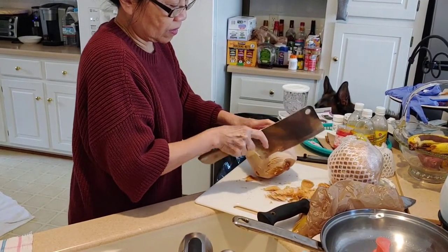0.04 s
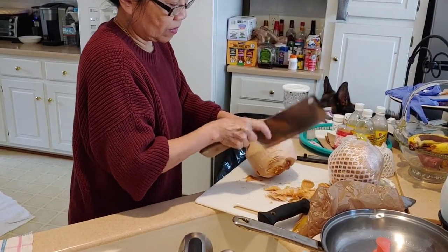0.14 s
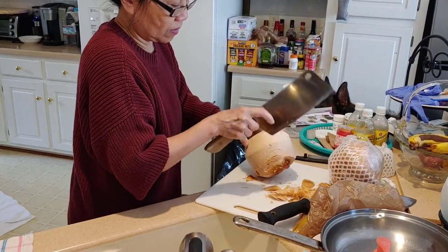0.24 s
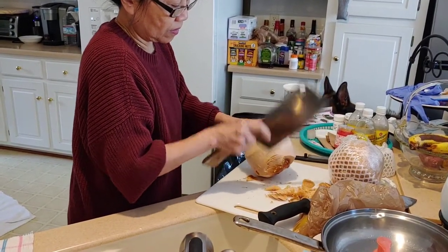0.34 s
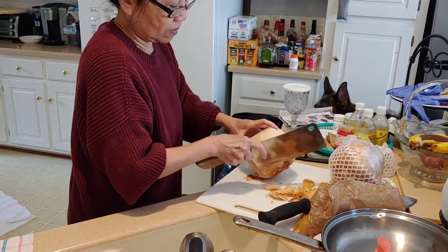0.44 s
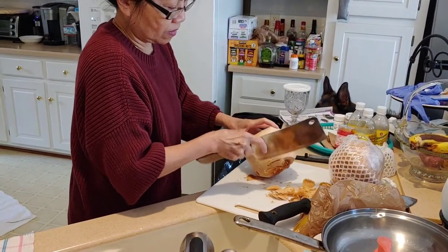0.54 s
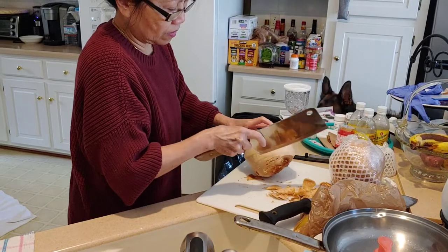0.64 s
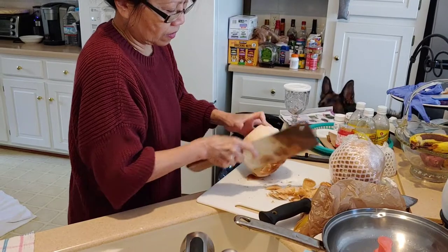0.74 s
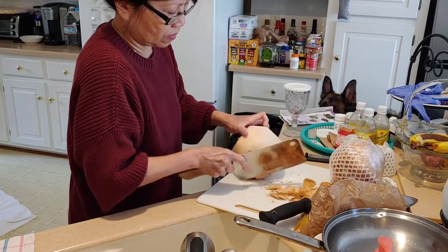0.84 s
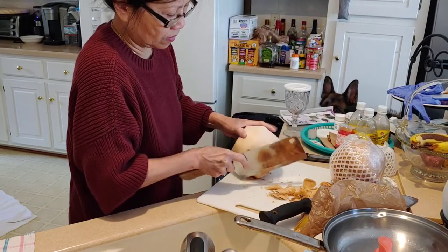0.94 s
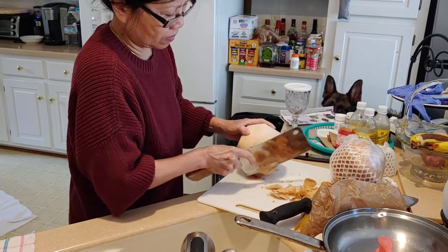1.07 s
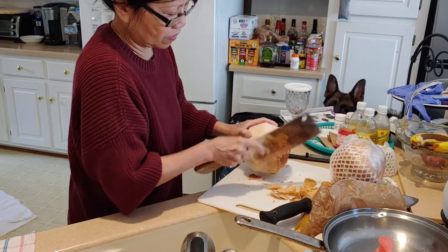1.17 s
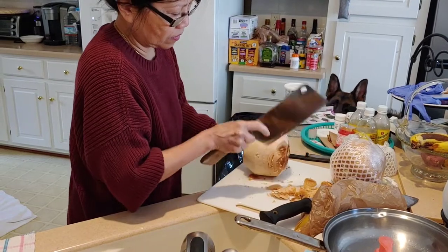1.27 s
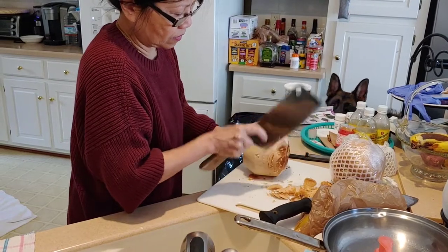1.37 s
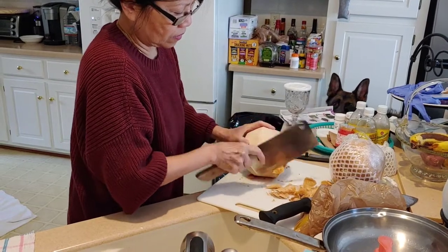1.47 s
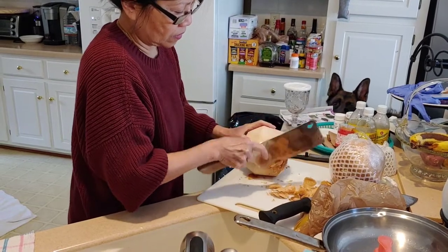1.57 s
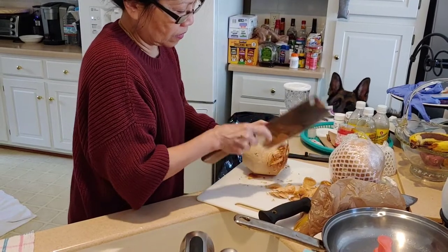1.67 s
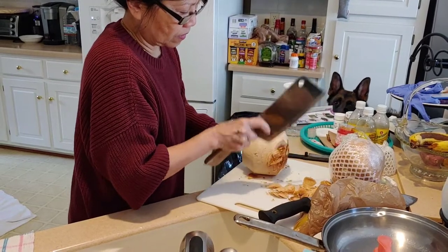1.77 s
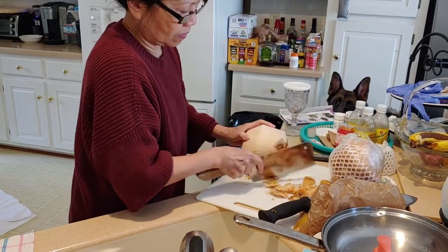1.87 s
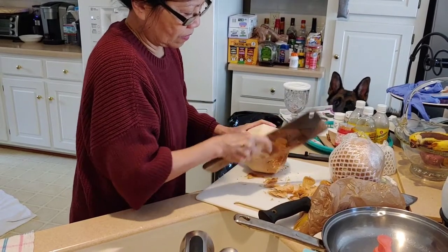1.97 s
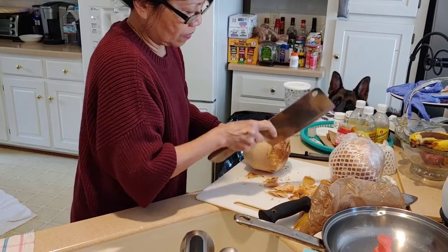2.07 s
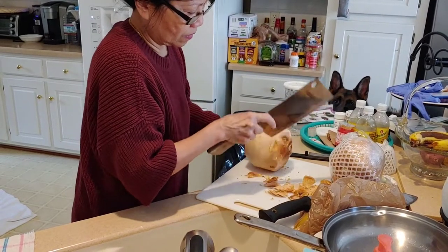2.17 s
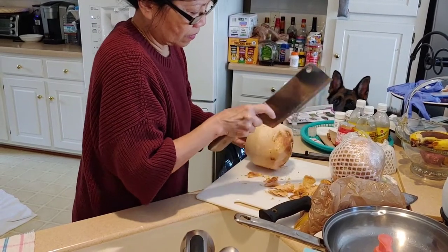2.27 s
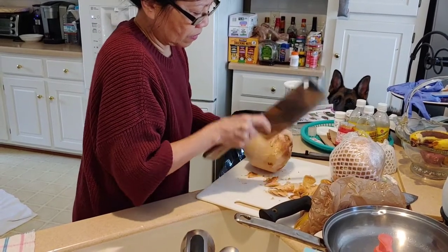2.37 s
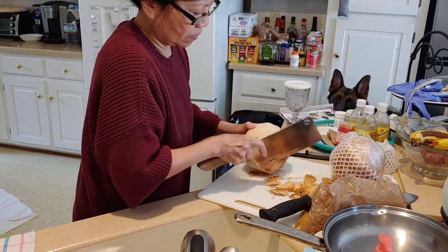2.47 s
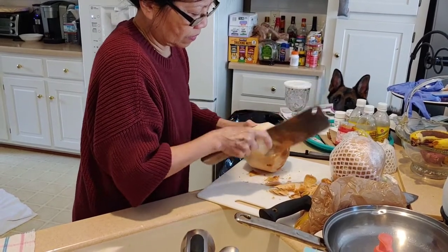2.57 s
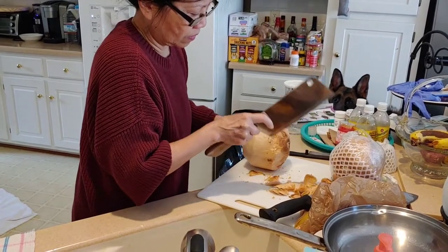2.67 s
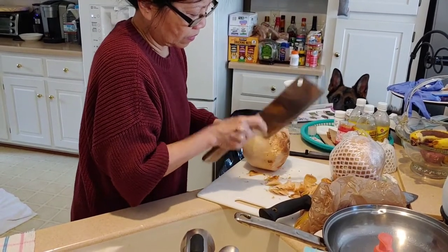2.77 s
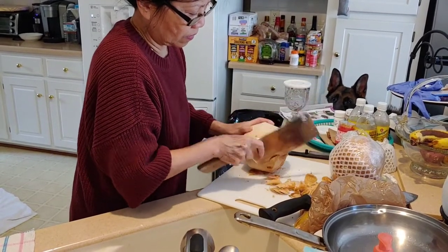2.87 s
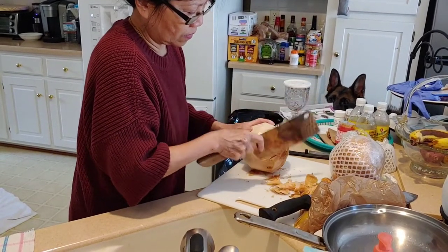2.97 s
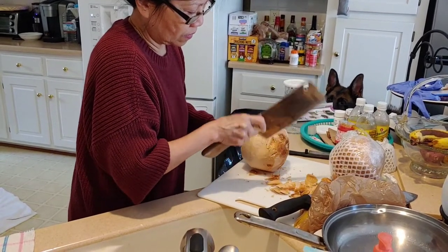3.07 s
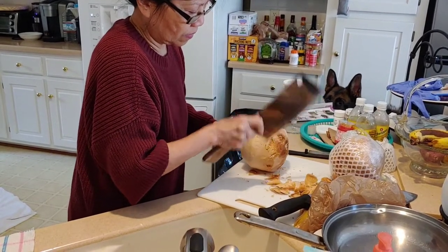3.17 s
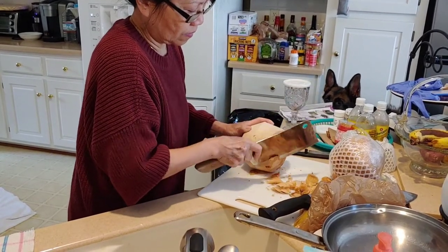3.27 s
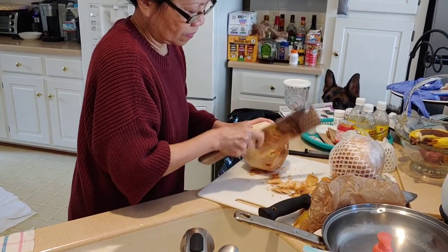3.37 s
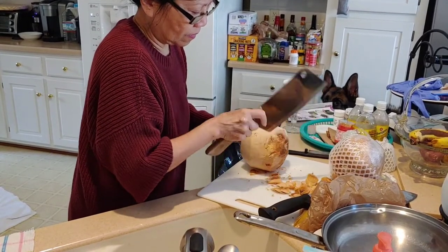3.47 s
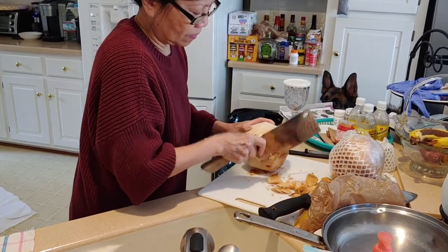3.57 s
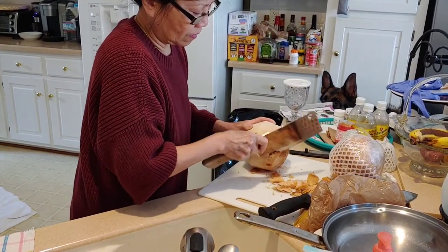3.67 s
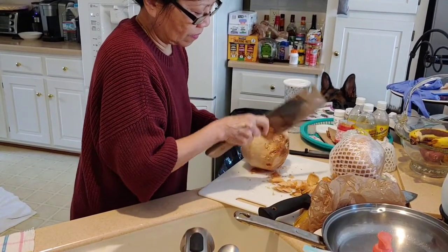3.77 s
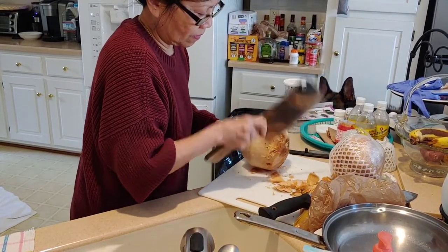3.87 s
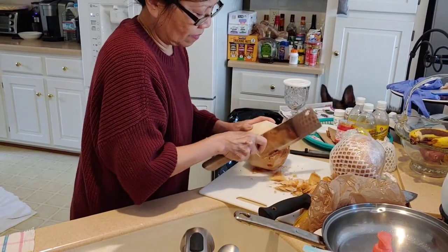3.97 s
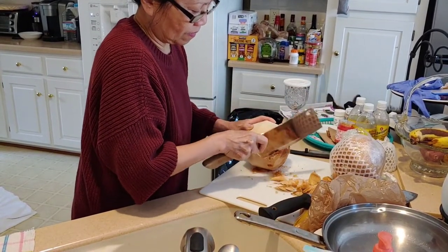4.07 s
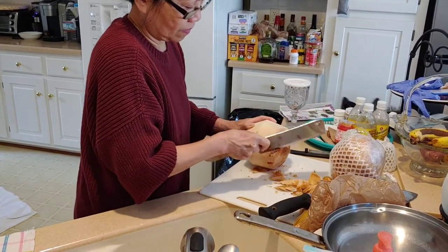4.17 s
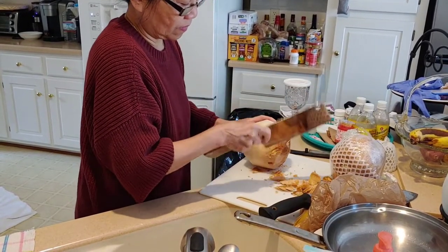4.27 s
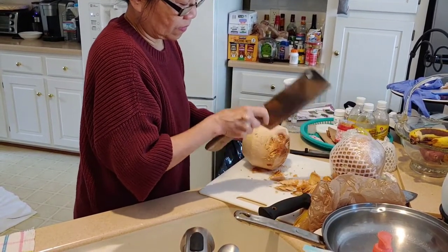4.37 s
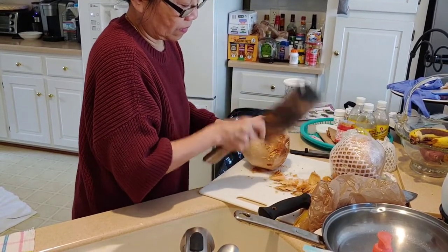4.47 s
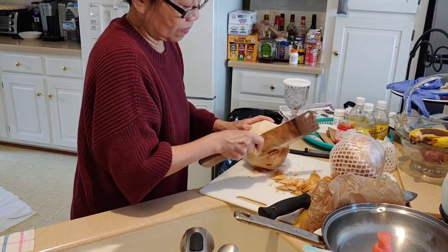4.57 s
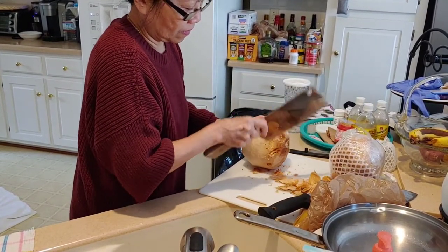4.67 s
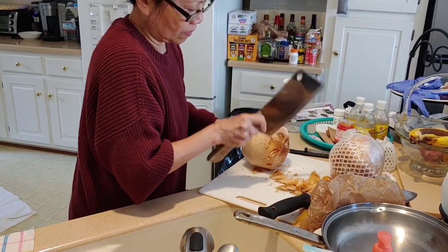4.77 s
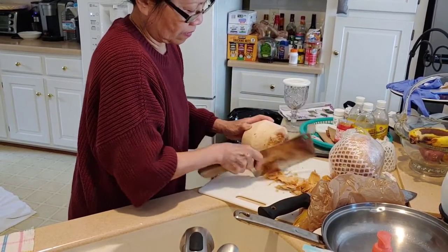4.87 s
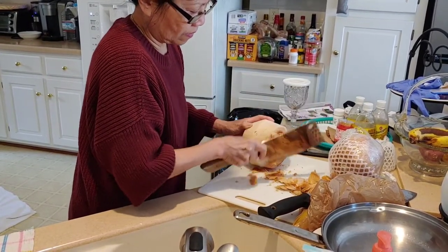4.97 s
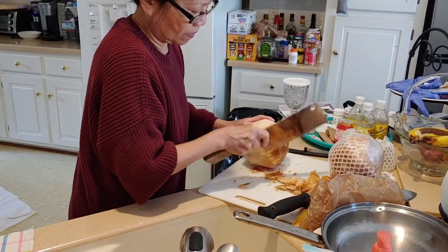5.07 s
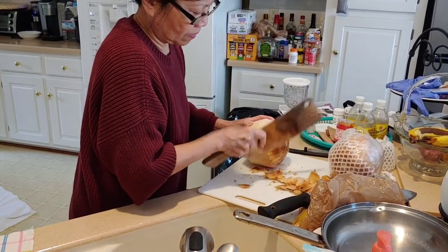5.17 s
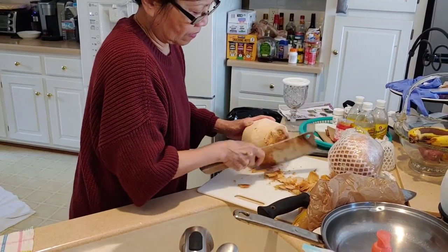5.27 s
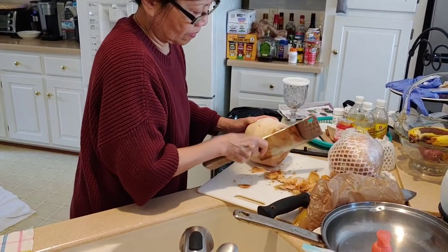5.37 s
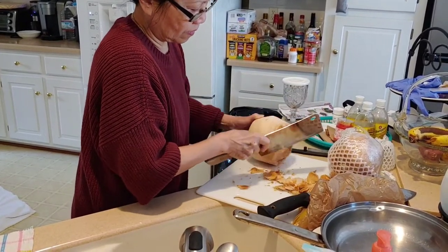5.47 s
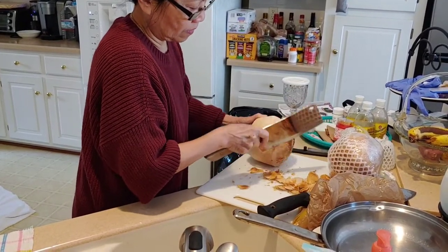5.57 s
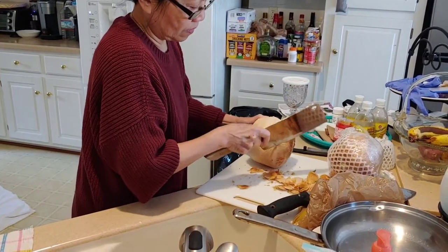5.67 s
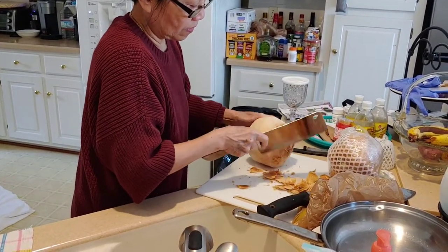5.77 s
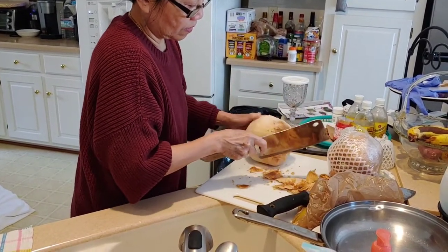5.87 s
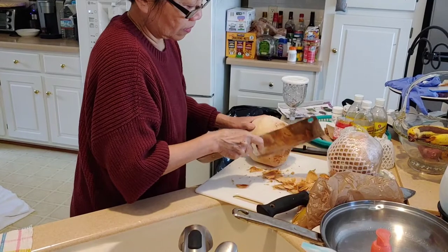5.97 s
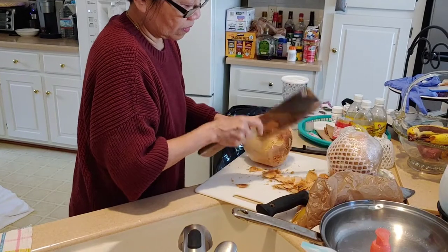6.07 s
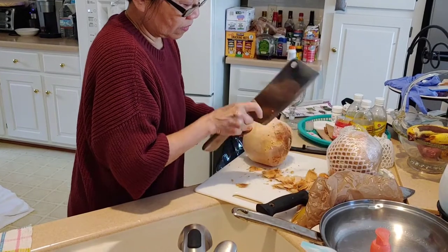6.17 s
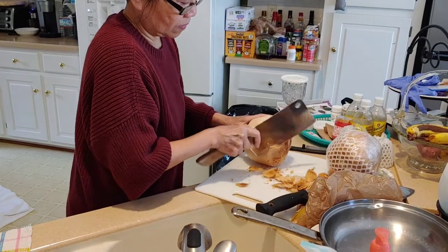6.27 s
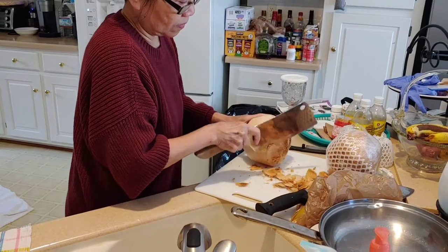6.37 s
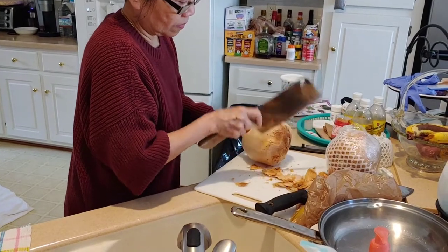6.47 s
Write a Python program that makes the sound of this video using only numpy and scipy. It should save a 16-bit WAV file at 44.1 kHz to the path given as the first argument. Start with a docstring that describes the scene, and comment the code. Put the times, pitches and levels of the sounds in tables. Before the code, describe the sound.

Close to the microphone, a heavy cleaver pares a fibrous coconut on a plastic board. About fourteen uneven chops crunch and tear the husk, each with a low thump that shakes the counter. Three sharp smacks ring the board as the blade comes through, and the nut groans briefly after one hard blow. Faint scuffs fill gaps; a hard-walled kitchen rings shortly over soft fridge hum.

```python
"""In a live, hard-walled kitchen, a heavy cleaver pares a coconut on a plastic board, near the microphone.
Each chop tears fibres in showers of grains and thumps the nut, which shakes the counter's modes.
Three firm blows and a faint one smack the board, ringing its modes and the blade's.
The nut groans as it rocks after one hard blow, grainy scuffs brush the husk,
and a fridge behind adds wavering hum over room hush."""
import sys
import numpy as np
from scipy import signal
from scipy.fft import rfft, irfft, next_fast_len
from scipy.io import wavfile

SR = 44100
rng = np.random.default_rng(int(sys.argv[2]) if len(sys.argv) > 2 else 0)


def store_pcm(level_fs):
    """Save levels as 16-bit WAV."""
    pcm = np.round(np.clip(level_fs, -1, 1) * 32767).astype(np.int16)
    wavfile.write(sys.argv[1], SR, np.atleast_2d(pcm).T)


N = 287948  # samples
AGE = np.arange(SR // 3) / SR  # time since a contact, s
USUAL_FORCE_DB = -19.5  # force of a chop, taken as the level of its crunch


def amp(db):
    """Decibels to gain."""
    return 10 ** (np.asarray(db) / 20)


def read(points, hz):
    """Read a table of (Hz, value) on a log-frequency axis."""
    f, value = np.transpose(points)
    return np.interp(np.log(np.maximum(hz, 1)), np.log(f), value)


def colour(x, points):
    """Causal, minimum-phase filter with the given spectrum in dB, made by folding its cepstrum."""
    size = 4096
    log_gain = np.log(amp(read(points, np.fft.rfftfreq(size, 1 / SR))))
    cepstrum = irfft(log_gain)
    cepstrum[1:size // 2] *= 2
    cepstrum[size // 2 + 1:] = 0
    response = irfft(np.exp(rfft(cepstrum)))
    return signal.fftconvolve(x, response)[:len(x)]


def burst(x, db):
    """Give a short sound the energy of ten milliseconds at this RMS level."""
    return x * amp(db) * np.sqrt(SR / 100 / np.sum(x ** 2))


def fade(t, t60):
    """Exponential decay by 60 dB in t60 seconds."""
    return np.exp(-np.log(1000) * t / t60)


def add(track, s, x):
    """Mix a sound in at a time in seconds."""
    i = max(int(s * SR), 0)
    track[..., i:i + x.shape[-1]] += x[..., :max(N - i, 0)]


def even(x, flatness=0.76):
    """Level the chance spectral peaks of a short crackle, so that it has little pitch of its own."""
    spectrum = rfft(x)
    flattened = spectrum / (np.abs(spectrum) + 1e-9) ** min(flatness, 1)
    return irfft(flattened, len(x)) * (AGE < .1)


def grains(envelope, per_s, spread_db):
    """Random clicks of very unequal size under an envelope, like fibres parting one by one."""
    n = len(envelope)
    size = amp(abs(spread_db) * np.minimum(rng.exponential(size=n), 4))
    happens = rng.random(n) < per_s / SR
    return even(envelope * happens * size * rng.choice([-1, 1], n))


def ring(push, modes, ratio=1, scatter=0.015):
    """Modes rung by a push; the grip and the point of contact detune them a little."""
    tones = np.zeros(len(AGE))
    for hz, db, t60 in modes:
        detuned_hz = hz * ratio * (1 + scatter * rng.standard_normal())
        tone = np.sin(2 * np.pi * detuned_hz * AGE)
        tones += amp(db) * fade(AGE, t60) * tone * rng.choice([-1, 1])
    return signal.fftconvolve(push, tones)[:len(AGE)]


# The blade into the husk. Each row: start in seconds, length of the cut in seconds, force in dB,
# fibre fizz in dB, crack in dB, pitch of the nut's thud in Hz.
CHOPS = [(0.000, 0.014, -19, -29, -34, 164), (0.436, .024, -22.5, -31.5, -50, 198),
         (1.286, 0.0085, -13.5, -24.5, -17, 129), (1.474, 0.023, -29, -32.5, -39, 191),
         (1.883, .0105, -26, -34, -37, 260), (2.484, 0.028, -29.5, -39, -55, 270),
         (2.886, 0.027, -22, -34, -43, 257), (3.275, 0.028, -20.5, -29, -29.5, 168),
         (3.622, 0.028, -20.5, -31.5, -33, 190), (3.964, .012, -10.5, -27.5, -24, 162),
         (4.566, 0.0071, -10, -24, -19.5, 217), (4.887, 0.025, -21, -30.5, -24, 236),
         (5.272, .036, -33.5, -32, -49, 197), (6.32, .021, -23.5, -26, -34, 225)]
# The dull crunch of crushed husk. Each row: frequency in Hz, relative level in dB.
CRUNCH_SPECTRUM = [(100, -17.5), (220, 2.5), (350, 4.5), (500, -2.5), (700, 0.5), (1000, 1), (1350, -3.5),
                   (2100, -5), (2800, -19.5), (5000, -25.5), (12000, -45.5)]
# The steel of the cleaver. Each row: mode in Hz before detuning, relative level in dB, t60 in seconds.
BLADE_MODES = [(1365, -3.5, 0.091), (1518, 4.5, 0.096), (1946, 5.5, .07), (3300, -11, .05),
               (3575, 1, 0.049), (5520, -9, 0.065), (6360, 8, 0.046)]
THUD_DB, THUD_GROWTH = -21.5, 1.34  # thud at the usual force; dB more for each dB of force
# counter sway at the usual force, dB; dB more for each dB of force; length of cut in s that gives this
SHOVE_DB, SHOVE_GROWTH, SHOVE_S = -19.5, 0.73, 0.019


def chops(blade_db=-20, crunch_lag=0.85, judder_db_per_s=330, firm_judder_db=-6,
          air_db_per_s=450, firm_air_db=-8, thud_lead=0.0012):
    """Fibres tear one after another as the edge sinks in; the deeper, duller crunch follows the first fizz."""
    out = np.zeros(N)
    for s, length, force_db, fizz_db, _, thud_hz in CHOPS:
        depth = AGE / length
        extra_force_db = force_db - USUAL_FORCE_DB
        fibres = grains(np.exp(-depth ** 2), per_s=4100, spread_db=4)
        crush = grains(depth ** crunch_lag * np.exp(-1.3 * depth ** 2), per_s=5500, spread_db=2.5)
        # a long, glancing cut hisses more and drags the nut about more than a firm one
        cut = burst(fizz(fibres, firm_air_db + air_db_per_s * length), fizz_db)
        cut = cut + burst(colour(crush, CRUNCH_SPECTRUM), force_db)
        cut = cut + burst(ring(fibres, BLADE_MODES), fizz_db + blade_db)
        judder_db = firm_judder_db + judder_db_per_s * length
        body = thud(thud_hz, THUD_DB + THUD_GROWTH * extra_force_db, counter_db=-8.5, judder_db=judder_db)
        # a longer push moves the counter more
        sway = rumble(SHOVE_DB + SHOVE_GROWTH * extra_force_db) * length / SHOVE_S
        add(out, s, cut)
        add(out, s - thud_lead, body + sway)  # the nut is pushed just before the husk gives way
    return out


# The bright tearing of fibres. Each row: frequency in Hz, relative level in dB.
FIZZ_SPECTRUM = [(800, -3.5), (2200, -11), (3600, 1.5), (5200, 1.5), (6600, 5), (7800, -7), (11500, -10.5),
                 (13000, -24)]


def fizz(x, air_db):
    """The bright part of a cut, with more or less of the very top."""
    bright = colour(x, FIZZ_SPECTRUM)
    return colour(bright, [(6000, 0.0079), (11000, air_db)])


# The counter under the board. Each row: mode in Hz before detuning, relative level in dB, t60 in seconds.
COUNTER_MODES = [(61, -11.5, 0.39), (83, -8.5, 0.14), (115, -4, 0.14), (174.3, 10, 0.28), (270, -3, 0.057),
                 (332.2, 4, 0.27), (400, -5, 0.1)]
# The nut juddering to rest. Each row: frequency in Hz, relative level in dB.
JUDDER_SPECTRUM = [(20, -7.5), (35, -3.5), (70, 5), (115, -1.5), (160, -2), (255, 0.5), (340, -7),
                   (450, -12.5), (900, -25), (3000, -81.5)]


def thud(hz, db, counter_db, judder_db, cycles=1.0, judder_s=0.024):
    """The nut bounces on the board for a cycle or two, shakes the counter and judders to rest."""
    turns = hz * AGE
    bounce = np.sin(2 * np.pi * turns) * np.sqrt(turns) * np.exp(-turns / cycles)
    shake = ring(np.exp(-AGE / 0.00029), COUNTER_MODES, scatter=0.039)
    swell = np.sqrt(AGE) * np.exp(-AGE / judder_s)
    judder = colour(rng.standard_normal(len(AGE)) * swell, JUDDER_SPECTRUM)
    return burst(bounce, db) + burst(shake, db + counter_db) + burst(judder, db + judder_db)


# The low sway of the counter. Each row: frequency in Hz, relative level in dB.
RUMBLE_SPECTRUM = [(18, -8), (33, -9), (65, -4), (120, -8), (190, -11.5), (400, -37), (1500, -76.5)]


def rumble(db, swell_s=0.026):
    """The shove of the blade sets the whole counter swaying, late and low."""
    shove = rng.standard_normal(len(AGE)) * AGE * np.exp(-AGE / swell_s)
    return burst(colour(shove, RUMBLE_SPECTRUM), db)


CRACK_DEPTH = 0.35  # share of the cut at which a bundle of fibres gives way
# pitch at the usual force; this much more force breaks a bundle an octave lower
CRACK_HZ, CRACK_DB_PER_OCTAVE = 5270, 17.5
CATCH_DB, CATCH_DB_PER_S = -19, -650  # blade ring on a dead stop; a longer cut weakens it
SETTLE_S, SETTLE_SCATTER_S = .031, .004  # the nut drops back this long after the cut ends
SETTLE_TICK_DB, SETTLE_TICK_HZ = -15.5, 5200  # level against the fizz
SETTLE_KNOCK_DB, SETTLE_KNOCK_HZ = -35, 1100


def cracks(catch_delay_s=0.001984):
    """In each chop the edge catches and rings, fibres break, and the nut drops back with a tick and a knock."""
    out = np.zeros(N)
    for s, length, force_db, fizz_db, crack_db, _ in CHOPS:
        add(out, s + catch_delay_s, catch(CATCH_DB + CATCH_DB_PER_S * length))
        crack_hz = CRACK_HZ * 2 ** ((USUAL_FORCE_DB - force_db) / CRACK_DB_PER_OCTAVE)
        add(out, s + CRACK_DEPTH * length, snap(crack_hz, crack_db))
        settled = s + length + SETTLE_S + SETTLE_SCATTER_S * rng.standard_normal()
        tick = snap(SETTLE_TICK_HZ, fizz_db + SETTLE_TICK_DB)
        knock = snap(SETTLE_KNOCK_HZ, SETTLE_KNOCK_DB)
        add(out, settled, tick + knock)
    return out


def catch(db, contact_s=.00004):
    """The edge meets something hard, a very brief push that rings the steel shortly."""
    return burst(ring(np.exp(-AGE / contact_s), BLADE_MODES), db)


def snap(hz, db, t60=0.0096):
    """A single dry click of husk: a short noise decay through the husk's resonance."""
    click = even(rng.standard_normal(len(AGE)) * fade(AGE, t60))
    return burst(husk(click, hz), db)


def husk(x, hz, low_db=-22, high_db=-13, top_db=-36):
    """The broad resonance of a strip of husk, strongest from about half this frequency up to it."""
    return colour(x, [(hz / 4, low_db), (hz * 0.45, -1), (hz * 1.09, -1), (hz * 2.2, high_db), (hz * 5, top_db)])


# The blade onto the board. Each row: start in seconds, smack in dB, edge click in dB, board ring in dB,
# thud in dB, pitch ratio of the board's modes.
STRIKES = [(1.927, -8.5, -14, -11, -16.5, 0.93), (4.930, -8.5, -16.5, -19, -16, 1),
           (5.297, -6, -13.5, -13.5, -17, 0.93), (6.368, -25, -27, -29, -22.5, 0.94)]
# The plastic board. Each row: mode in Hz before the pitch ratio, relative level in dB, t60 in seconds.
BOARD_MODES = [(760, -16, 0.044), (830, -35.5, 0.03), (921, -8.5, 0.093), (1003, 11, 0.059),
               (1064, 0.5, 0.068), (1490, -14, .07), (1501, -5.5, 0.097), (1727, -4.5, 0.16),
               (2040, -7, 0.11)]
# The flat smack of the landing. Each row: frequency in Hz, relative level in dB.
SMACK_SPECTRUM = [(100, -30), (220, -4.5), (340, 1), (460, -1.5), (750, 1), (1050, 2.5), (1350, -3),
                  (2100, -1), (2700, -13), (5000, -21), (12000, -48.5)]


def strikes(blade_db=-12, thud_hz=250, edge_delay=0.001933, air_db=-5):
    """The blade comes through and lands on the board, heel first, then the whole edge."""
    out = np.zeros(N)
    for s, smack_db, click_db, ring_db, thud_db, ratio in STRIKES:
        contact = grains(fade(AGE, 0.085), per_s=7000, spread_db=-1.0)
        edge = grains(fade(AGE, 0.025), per_s=7000, spread_db=1)
        board = ring(np.exp(-AGE / .0001), BOARD_MODES, ratio, scatter=0.0034)
        smack = burst(colour(contact, SMACK_SPECTRUM), smack_db)
        add(out, s, smack + thud(thud_hz, thud_db, counter_db=-2.5, judder_db=-1.5))
        click = burst(fizz(edge, air_db), click_db)
        steel = burst(ring(edge, BLADE_MODES), click_db + blade_db)
        add(out, s + edge_delay, click + steel + burst(board, ring_db))
    return out


# the nut rocking on the board after one hard blow
ROCK_START_S, ROCK_LENGTH_S, ROCK_DB, ROCKS_PER_S = 4.125, 0.269, -18, 20.1
# pitch before its random wobble; time constant of the sag
ROCK_FIRST_HZ, ROCK_LAST_HZ, ROCK_SAG_S = 250.5, 200, 0.0352


def rocking(overtone_db=-17, throb=0.49, wobble=0.053, low_db=-1, low_peak=0.61, low_width=0.22,
            roughness=0.59):
    """The round nut judders: a rough, throbbing groan sags in pitch; a lower octave swells past halfway."""
    t = np.arange(int(ROCK_LENGTH_S * SR)) / SR
    progress = t / ROCK_LENGTH_S
    rock = np.cos(2 * np.pi * ROCKS_PER_S * t)
    drift = np.interp(progress, np.linspace(0, 1, num=10), rng.standard_normal(size=10))
    rough = np.interp(progress, np.linspace(0, 1, num=60), rng.standard_normal(size=60))
    sagging_hz = ROCK_LAST_HZ + (ROCK_FIRST_HZ - ROCK_LAST_HZ) * np.exp(-t / ROCK_SAG_S)
    phase = 2 * np.pi * np.cumsum(sagging_hz * (1 + wobble * drift)) / SR
    harmonics = sum(amp(overtone_db * k) * np.sin((k + 1) * phase) for k in range(3))
    groan = (1 - throb * rock) * (1 + roughness * rough) * harmonics
    low = amp(low_db) * np.exp(-((progress - low_peak) / low_width) ** 2) * np.sin(phase / 2)
    shaped = (groan * np.sqrt(1 - progress) + low) * signal.windows.tukey(len(t), .1)
    out = np.zeros(N)
    add(out, ROCK_START_S, burst(shaped, ROCK_DB))
    return out


# Hand and blade brushing the husk. Each row: start in seconds, time scale of the stroke in seconds,
# level in dB, frequency of the husk's resonance in Hz.
RUBS = [(0.712, 0.026, -34, 2280), (0.928, 0.022, -47, 1880), (4.232, .027, -55.5, 4100),
        (4.79, 0.22, -50.5, 4270), (5.6, 0.045, -46, 3000), (5.861, .04, -52, 2830),
        (6.025, 0.024, -45, 3670), (6.506, 0.04, -41.5, 1700)]


def rubs(tick_db=-3, tick_growth=1.4, loud_db=-32, tick_delay_s=0.0056, air_db=-28, blade_db=-13):
    """Grainy scuffs as the nut is turned and the blade set on it; firmer ones tick more, the steel answers."""
    out = np.zeros(N)
    for s, length, db, hz in RUBS:
        stroke = AGE / length
        scuff = grains(stroke ** .5 * np.exp(-1.5 * stroke), per_s=2700, spread_db=6.5)
        brush = burst(husk(scuff, hz, top_db=air_db), db)
        steel = burst(ring(scuff, BLADE_MODES), db + blade_db)
        add(out, s, brush + steel)
        add(out, s + tick_delay_s, snap(hz, loud_db + tick_db + tick_growth * (db - loud_db)))
    return out


# The worktop's early reflections. Each row: frequency in Hz, relative level in dB.
SCATTERING = [(120, -16), (350, -5.5), (800, -7)]


def near(x, direct_db=-3, early_db=-4, early_t60=0.17, gap_s=0.0015):
    """Direct sound and quick reflections from the crowded worktop, which scatters long waves least."""
    early = diffuse(len(AGE)) * fade(AGE, early_t60) * (AGE > gap_s)
    early = np.array([colour(side, SCATTERING) for side in early])
    response = amp(early_db) * early / np.sqrt(np.sum(early ** 2) / 2)
    # the direct sound reaches the left channel one sample after the right
    response[0, 1] += amp(direct_db)
    response[1, 0] += amp(direct_db)
    return signal.fftconvolve(x[None], response, axes=1)[:, :N]


# How alike the two channels hear the room. Each row: frequency in Hz, left-right correlation.
ROOM_LIKENESS = [(60, 0.94), (150, 0.97), (300, 0.89), (600, 0.69), (1200, 0.015), (5000, 0)]


def diffuse(n):
    """Two channels of white noise, alike in the bass and unrelated in the treble."""
    likeness = np.clip(read(ROOM_LIKENESS, np.fft.rfftfreq(n, 1 / SR)), -.9, .995)
    mid, side = rfft(rng.standard_normal((2, n)))
    shared = mid * np.sqrt((1 + likeness) / 2)
    opposed = side * np.sqrt((1 - likeness) / 2) * np.array([[1], [-1]])
    return irfft(shared + opposed, n)


# How long the kitchen rings on. Each row: frequency in Hz, t60 in seconds.
ROOM_T60 = [(60, 0.41), (200, 0.4), (600, 0.55), (2000, 0.53), (5000, 0.41), (11000, 0.3)]


def kitchen(x, tail_db=-9.5, build_s=0.0051):
    """The long tail of a hard room, each octave fading at its own pace."""
    t, hz = np.arange(SR) / SR, np.fft.rfftfreq(SR, 1 / SR)
    noise = rfft(diffuse(SR))
    octave = np.round(np.log2(np.maximum(hz, 64)))
    tail = np.zeros((2, SR))
    for k in np.unique(octave):
        band = irfft(noise * (octave == k), SR)
        tail += band * fade(t, read(ROOM_T60, 2 ** k))
    tail = tail * (1 - np.exp(-t / build_s))
    response = amp(tail_db) * tail / np.sqrt(np.sum(tail ** 2) / 2)
    return signal.fftconvolve(x[None], response, axes=1)[:, :N]


# The hush of the room. Each row: frequency in Hz, relative level in dB.
HUSH_SPECTRUM = [(25, -11.5), (40, -11.5), (55, 5.5), (75, -5.5), (115, -5), (160, -15), (255, -8),
                 (400, -18.5), (1500, -25.5), (2050, -23.5), (2500, -33.5), (6600, -39), (8000, -47.5),
                 (12000, -48)]
# The fridge motor. Each row: frequency in Hz, level in dB around which it wavers.
HUM = [(59.2, -48), (118.4, -55), (242.2, -55)]
HUSH_DB = -46.5


def fridge():
    """Motor hum, sines that waver slightly in level, over the noise hush of the room."""
    t = np.arange(N) / SR
    hush = np.array([colour(side[:N], HUSH_SPECTRUM) for side in diffuse(next_fast_len(N, True))])
    out = hush * amp(HUSH_DB) / hush.std()
    knots, waver_db = np.linspace(0, t[-1], num=40), 2.2
    for hz, db in HUM:
        waver = np.interp(t, knots, rng.standard_normal(len(knots)))
        tone = np.sin(2 * np.pi * (hz * t + rng.random()))
        out = out + np.sqrt(2) * amp(db + waver_db * waver) * tone
    return out


# The two ports of the microphone. Each row: frequency in Hz, left minus right in dB.
MIC_BALANCE = [(60, 2.2), (130, 2.1), (260, .5), (500, -1.2), (1000, -3.5), (2000, 2), (4300, 5.3),
               (6500, -.8)]


def scene():
    """Each side of the nut radiates its own detail: the front faces the microphone, both fill the kitchen."""
    front, back = (chops() + cracks() + strikes() + rubs() + rocking() for _ in range(2))
    wet = near(front) + kitchen(front) + kitchen(back)
    # each port of the microphone colours the sound differently
    ports = []
    for x, sign in zip(wet, (1, -1)):
        ports.append(colour(x, [(hz, sign * db / 2) for hz, db in MIC_BALANCE]))
    return np.array(ports) + fridge()


TOP_HZ = 12250  # upper limit of the recorder


def record(dry):
    """The recorder rounds the highest peaks and cuts the top."""
    rounded = dry / (1 + (dry / .9) ** 6) ** (1 / 6)
    low_pass = signal.ellip(8, .2, 70, TOP_HZ, fs=SR, output="sos")
    return signal.sosfilt(low_pass, rounded)


dry = scene()
out = record(dry)
store_pcm(out)
```